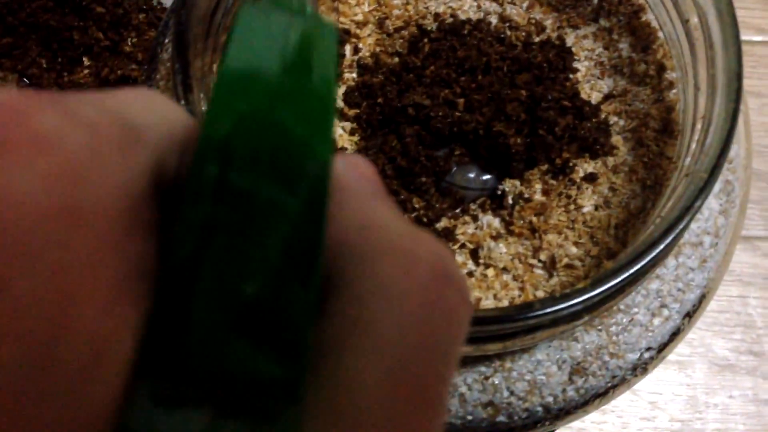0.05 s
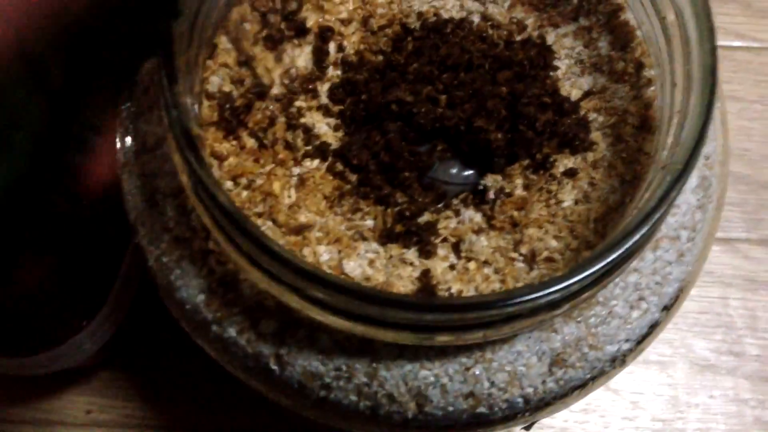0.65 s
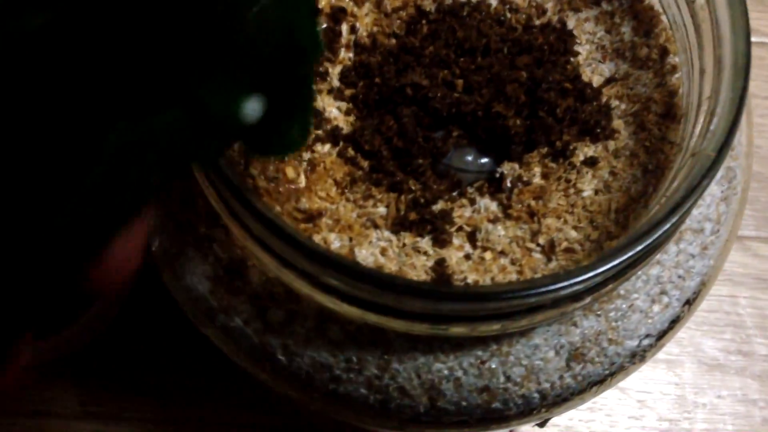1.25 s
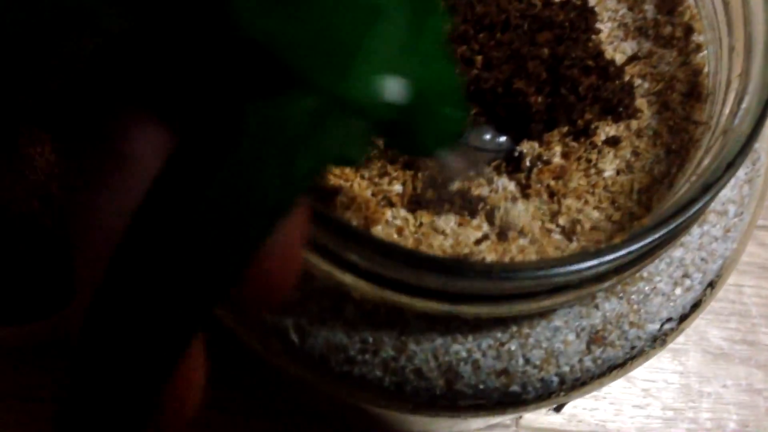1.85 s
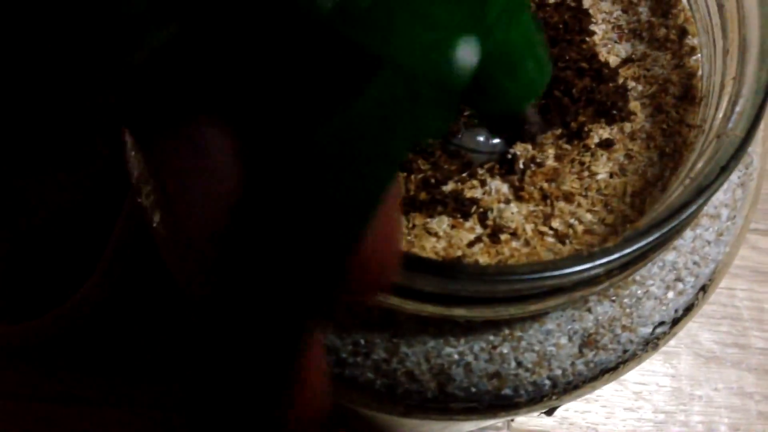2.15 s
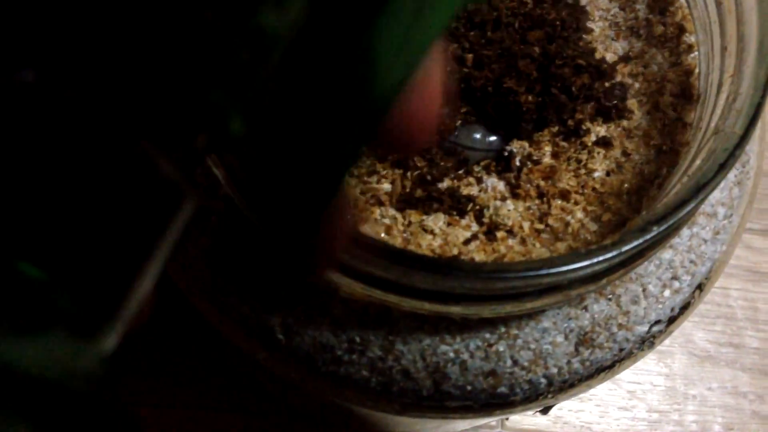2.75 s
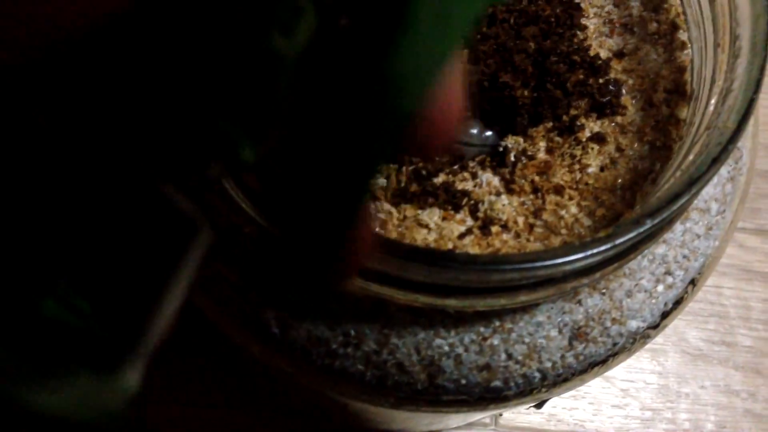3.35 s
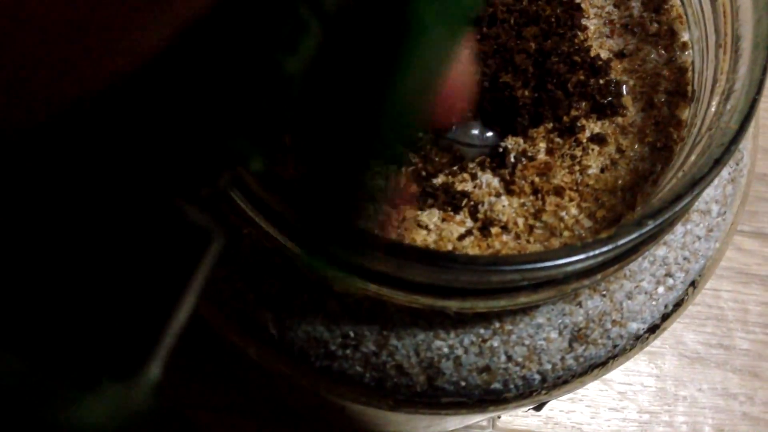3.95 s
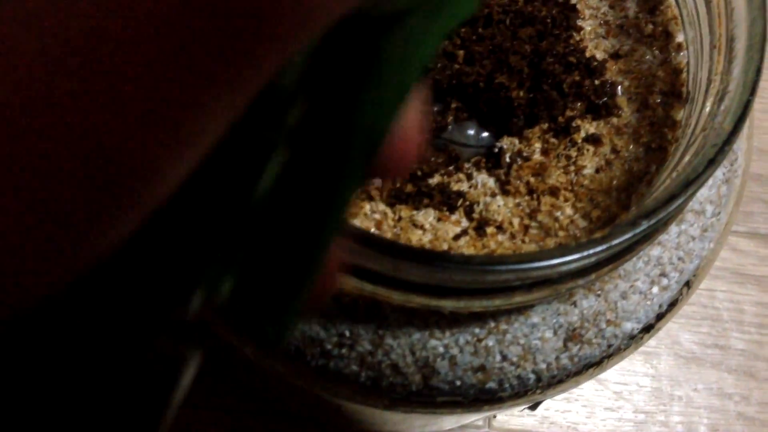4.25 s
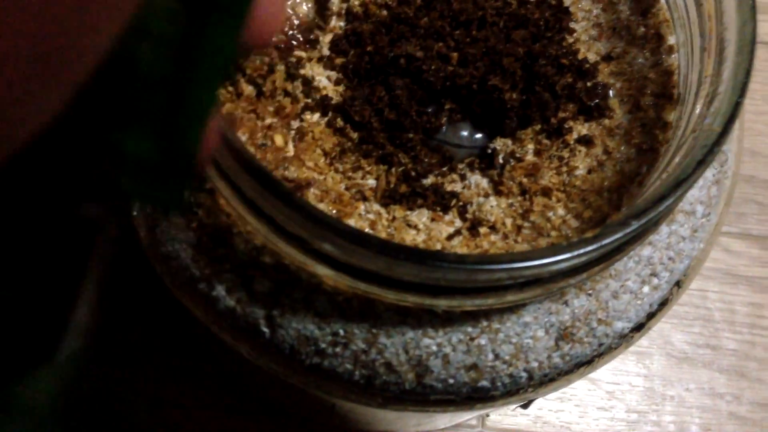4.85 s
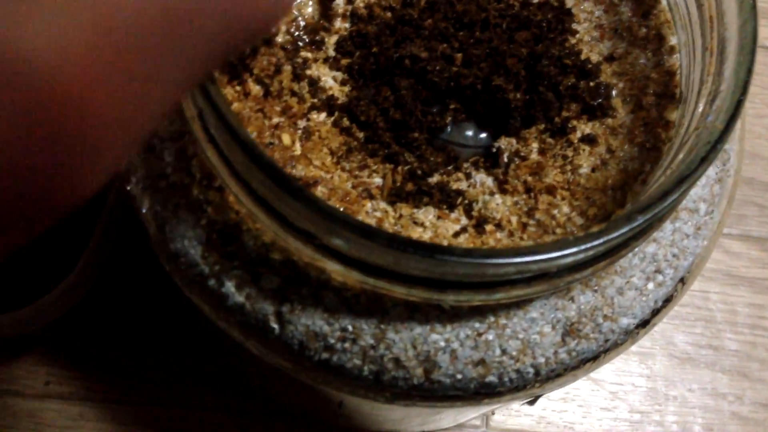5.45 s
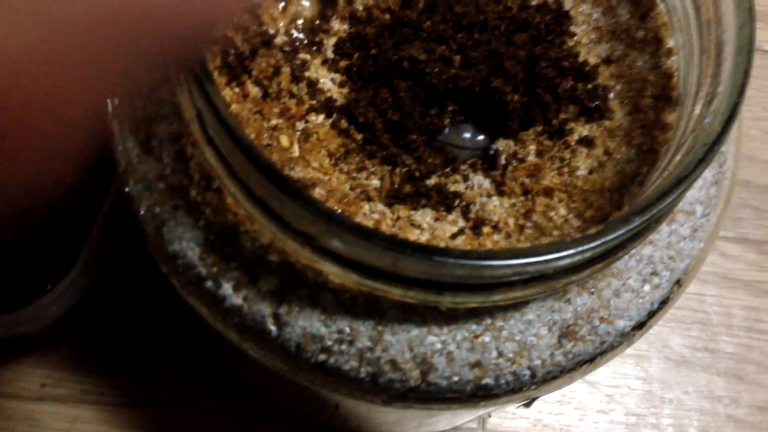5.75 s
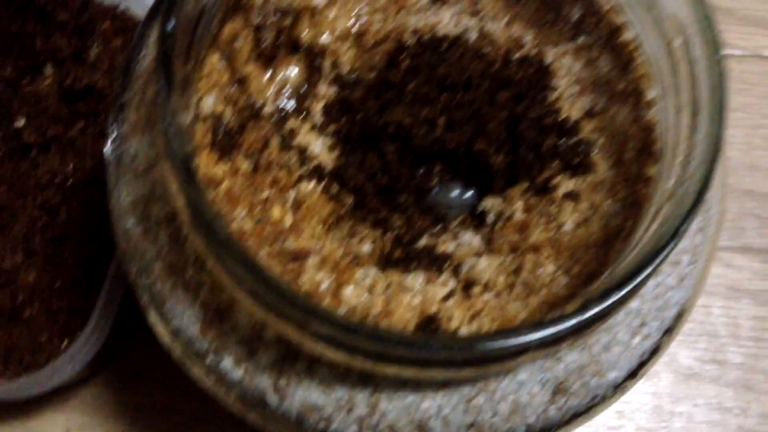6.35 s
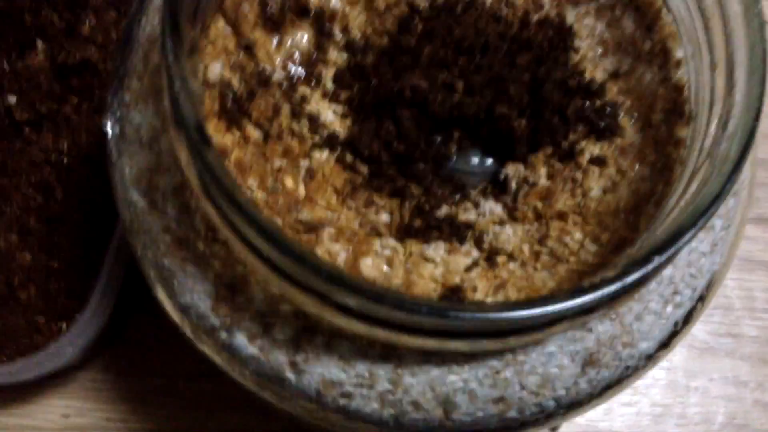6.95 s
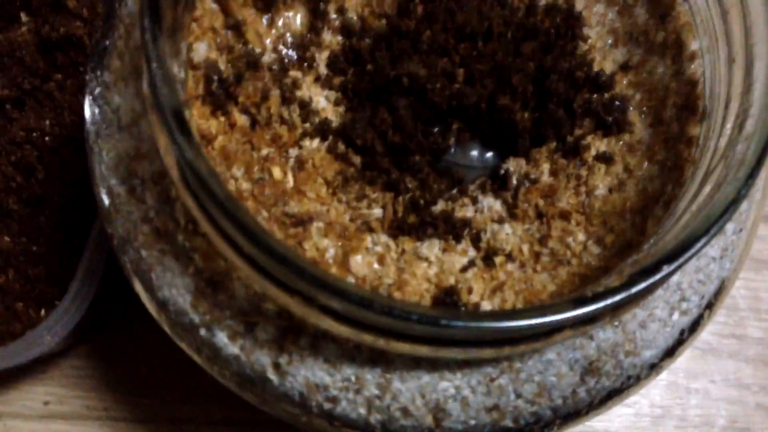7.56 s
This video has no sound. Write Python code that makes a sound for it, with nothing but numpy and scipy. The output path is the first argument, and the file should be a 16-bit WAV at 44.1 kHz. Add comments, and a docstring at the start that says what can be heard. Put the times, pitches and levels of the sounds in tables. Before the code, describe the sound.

A trigger spray bottle mists soil in a glass jar, heard close up over the faint hush of a small room. It opens with a click and a sharp squirt, then wet sputters and small glugs from about 0.5 to 0.8 seconds. Between 1.1 and 2.7 seconds come five smooth swells of hiss, evenly spaced, the last one softer. From 3 to 5 seconds the nozzle draws air and spits in irregular, crackling bursts with fine droplets and an occasional glug. Two gentler sprays follow at about 5.2 and 5.6 seconds. The plastic trigger clicks throughout the spraying, and a faint low hum from the jar sits under the jet. Around 6.3 seconds there is a quick cluster of hollow handling knocks, then another thud at 6.8 and lighter knocks near 7.4, with soft rubbing and a barely audible ring of glass.

```python
"""Spray bottle misting soil in a glass jar.

Close by in a quiet room, clean trigger strokes give smooth arches of hiss. When the tilted bottle draws
air, the nozzle spits and crackles. The plastic trigger clicks, water glugs and the jet stirs the jar's
air into a low hum. A few handling knocks follow."""
import sys
import numpy as np
from scipy import signal
from scipy.fft import rfft, irfft
from scipy.io import wavfile
from scipy.ndimage import uniform_filter1d

SR = 44100
rng = np.random.default_rng(int(sys.argv[2]) if len(sys.argv) > 2 else 0)


def write(x):
    x = np.atleast_2d(x).T
    wavfile.write(sys.argv[1], SR, np.round(np.clip(x, -1, 1) * 32767).astype(np.int16))


N = 340011
TIME = np.arange(N) / SR
BINS_HZ = np.fft.rfftfreq(4096, 1 / SR)


def amp(db):
    """Decibels to gain."""
    return 10 ** (np.asarray(db) / 20)


def unit(x):
    """Scales to rms 1."""
    return x / np.sqrt(np.mean(x ** 2) + 1e-20)


def crest(x):
    """Scales a hit so that its loudest 3 ms have rms 1."""
    return x / np.sqrt(uniform_filter1d(x ** 2, size=132, mode="constant").max() + 1e-20)


def power(x, samples):
    """Running mean square."""
    return abs(uniform_filter1d(x ** 2, size=samples))


def curve(points, hz=BINS_HZ):
    """Interpolates (Hz, value) points on a log-frequency axis."""
    point_hz, value = np.transpose(points)
    return np.interp(np.log(hz + 1), np.log(point_hz + 1), value)


def bump(hz, width_hz):
    """A resonance's outline over frequency, of height 1."""
    return 1 / (1 + (2 * (BINS_HZ - hz) / width_hz) ** 2)


def colour(x, db):
    """Minimum-phase filter with the given gain at each bin."""
    log_gain = np.log(amp(np.maximum(db, -100)))
    mirrored = np.concatenate([log_gain, log_gain[-2:0:-1]])
    taps = np.fft.ifft(np.exp(np.conj(signal.hilbert(mirrored)))).real
    return signal.oaconvolve(x, taps[:len(BINS_HZ)])[:len(x)]


def noise(db, samples=N):
    """Steady noise of rms 1 with the given spectrum."""
    return unit(colour(rng.standard_normal(samples), db))


def band(hz, width_hz, samples=N, skirt_db=30):
    """Noise of rms 1 around hz; more skirt_db gives steeper sides."""
    return noise(skirt_db * np.log10(bump(hz, width_hz)), samples)


def burst(envelope, db):
    """A noise hit with the given envelope and spectrum, at crest level 1."""
    return crest(colour(rng.standard_normal(len(envelope)) * envelope, db))


def wander(rate_hz):
    """Smooth random motion of rms 1, mostly below rate_hz."""
    lowpass = 1 / (1 + (np.fft.rfftfreq(N, 1 / SR) / rate_hz) ** 4)
    return unit(irfft(rfft(rng.standard_normal(N)) * lowpass, N))


def swell(peak_s, half_s):
    """A bell-shaped envelope of height 1."""
    return np.exp(-((TIME - peak_s) / half_s) ** 2)


def ring(hz, rise_s, t60_s):
    """A tone that swells, then decays."""
    t = TIME[:SR // 3]
    decay = amp(-60 * np.maximum(t - rise_s, 0) / t60_s)
    return np.sin(2 * np.pi * hz * t) * np.minimum(t / rise_s, 1) * decay


def resonate(x, hz, width_hz):
    """A resonance that follows the curve hz, applied twice for steep sides."""
    carrier = np.exp(2j * np.pi * np.cumsum(hz) / SR)
    pole = np.exp(-np.pi * width_hz / SR)
    return (carrier * signal.lfilter([(1 - pole) ** 2], [1, -2 * pole, pole ** 2], x / carrier)).real


def impulses(per_s, least_db, spread_db):
    """Impulses at random times, most of them small."""
    sizes = amp(least_db + spread_db * np.minimum(rng.exponential(1, N), 2))
    return (rng.random(N) < per_s / SR) * sizes


def add(mix, start_s, sound):
    """Mixes a sound in at start_s."""
    part = mix[max(round(start_s * SR), 0):][:len(sound)]
    part += sound[:len(part)]


# Background spectrum. Each row: frequency in Hz, relative density in dB.
HUSH_SPECTRUM = [(30, -6), (80, -6.5), (130, -10), (250, -0.5), (450, -10.5), (850, -6), (1100, -14.5),
                 (2000, -19), (3200, -24.5), (5500, -28.5), (7700, -28.5), (10000, -33), (13500, -31),
                 (15500, -30.5)]

def hush(db=-59.5):
    """The room's steady low noise."""
    return amp(db) * noise(curve(HUSH_SPECTRUM))


# Room decay. Each row: frequency in Hz, T60 in seconds.
ROOM_DECAY = [(200, 0.95), (1000, 0.45), (4000, 0.24), (14000, 0.28)]

def room(x, wet_db=-20):
    """A small furnished room adds a weak tail whose treble dies first."""
    hz, t, spectra = signal.stft(rng.standard_normal(SR // 2), SR, nperseg=256)
    decay = amp(-60 * t / curve(ROOM_DECAY, hz)[:, None])
    tail = signal.istft(spectra * decay, SR, nperseg=256)[1]
    tail[:SR // 250] = 0
    return x + amp(wet_db) * signal.fftconvolve(x, tail / np.linalg.norm(tail))[:N]


# Grip rumble. Each row: time in seconds, level in dB.
GRIP_LEVELS = [(7.38, -70), (7.42, -55.5), (7.52, -56.5), (7.6, -63.5), (7.7, -67)]
# A sleeve or hand passing. Each row: peak time in seconds, half length in seconds, level in dB.
BRUSH_PASSES = [(6.746, 0.18, -61.5), (7.639, 0.017, -55)]
# Brushing spectrum. Each row: frequency in Hz, relative density in dB.
BRUSH_SPECTRUM = [(300, -9), (1200, 7.5), (2200, 1.5), (4000, -2), (8000, -3.5), (10000, -12), (15000, -11)]

def rubbing():
    """The hand shifts its grip with a low rumble and soft brushes."""
    grip_db = np.interp(TIME, *np.transpose(GRIP_LEVELS), left=-120, right=-120)
    grip = uniform_filter1d(amp(grip_db), size=60)
    rumble = noise(curve([(60, -57), (130, 0.5), (200, 4), (400, -10.5), (1500, -22), (8000, -40)]))
    passes = sum(amp(db) * swell(peak_s, half_s) for peak_s, half_s, db in BRUSH_PASSES)
    return rumble * grip + noise(curve(BRUSH_SPECTRUM)) * passes


# Modes of the jar's glass. Each row: frequency in Hz, relative level in dB, T60 in seconds.
GLASS_MODES = [(3050, -4, 0.27), (5730, -5, 0.32), (7140, -3, .4), (9300, 0, 0.28), (12650, -8, .3)]
# Touches on the jar. Each row: start in seconds, gain in dB.
GLASS_TOUCHES = [(6.367, -68), (7.353, -63.5)]

def glass():
    """A light touch on the jar sets its high modes ringing."""
    out = np.zeros(N)
    chime = sum(amp(db) * ring(hz, 0.00085, t60_s) for hz, db, t60_s in GLASS_MODES)
    for start_s, db in GLASS_TOUCHES:
        add(out, start_s, amp(db) * chime)
    return out


# Handling knocks. Each row: start in seconds, thud level in dB, thud pitch in Hz, rattle level in dB.
HANDLING_KNOCKS = [(6.257, -23.5, 168.5, -31.5), (6.277, -28.5, 166.3, -33.5), (6.365, -31, 306, -32.5),
                   (6.411, -44.5, 300, -39), (6.771, -27, 146, -48), (6.845, -45.5, 219, -56),
                   (7.354, -39.5, 169, -42), (7.405, -41.5, 162, -50.5)]
# Modes of the rattle. Each row: nominal frequency in Hz, relative level in dB, T60 in seconds.
RATTLE_MODES = [(364, 6, 0.051), (497, -7, .07), (800, -3, 0.076), (1074, -1.5, 0.03), (1314, 3, 0.03),
                (1420, -1, 0.071), (1800, -4, 0.031), (2200, -18, 0.027), (2730, -26, 0.028),
                (4570, -8, 0.026)]

def knocks(scuff_s=0.015, scuff_db=-8, tick_s=0.0043, tick_db=-13):
    """A blow gives a low thud, a hollow rattle with a short scuff, and a tick."""
    out, t = np.zeros(N), TIME[:SR // 3]
    scuff_spectrum = curve([(60, -26), (200, 2.5), (1500, 6.5), (5000, -8.5), (15000, -30)])
    tick_spectrum = curve([(1500, -4.5), (4500, 6), (9000, -3), (15000, -12)])
    for start_s, thud_db, thud_hz, rattle_db in HANDLING_KNOCKS:
        modes = sum(amp(db) * ring(hz * rng.uniform(0.91, 1.02), 0.0012, t60_s) * rng.choice([-1, 1])
                    for hz, db, t60_s in RATTLE_MODES)
        scuff = amp(scuff_db) * burst(np.exp(-t / scuff_s), scuff_spectrum)
        tick = amp(tick_db) * burst(np.exp(-t / tick_s), tick_spectrum)
        add(out, start_s, amp(thud_db) * ring(thud_hz, rise_s=0.0024, t60_s=0.086))
        add(out, start_s, amp(rattle_db) * (crest(modes) + scuff + tick))
    return out


def ticking(start_s=5.805, every_s=0.0475, db=-60, decay_s=0.0014, count=7):
    """A short, even run of very fine ticks after the last stroke."""
    out, t = np.zeros(N), TIME[:SR // 50]
    spectrum = curve([(3000, -20), (9000, -18), (13000, 5)])
    for k in range(count):
        add(out, start_s + k * every_s, amp(db) * burst(np.exp(-t / decay_s), spectrum))
    return out


# Vent whistles. Each row: peak time and half length in seconds, level in dB, pitch and width in Hz.
VENT_WHISTLES = [(2.516, 0.019, -62.5, 8200, 2500), (4.735, 0.034, -69, 8100, 250),
                 (6.007, 0.049, -70, 7600, 600)]

def vents():
    """Air seeps back into the bottle with a thin whistle."""
    return sum(amp(db) * band(hz, width_hz) * swell(peak_s, half_s)
               for peak_s, half_s, db, hz, width_hz in VENT_WHISTLES)


# Glugs, pops and chirps in the bottle. Each row: start in seconds, peak level in dB, pitch in Hz.
BOTTLE_GLUGS = [(.474, -27, 256), (.478, -38, 573), (.502, -33.5, 1110), (.608, -29.5, 807),
                (0.978, -34.5, 1336), (3.655, -41.5, 263), (3.656, -42.5, 640), (4.717, -41, 269),
                (4.747, -35, 253), (5.130, -43, 687), (5.524, -36.5, 696), (5.527, -42, 260)]

def glugs(rise_cycles=2.35, big_hz=260, big_t60_s=0.067):
    """Bubbles and the bottle's hollow ring briefly: the higher, the shorter."""
    out = np.zeros(N)
    for start_s, db, hz in BOTTLE_GLUGS:
        t60_s = big_t60_s * (big_hz / hz) ** 0.41
        add(out, start_s, amp(db) * ring(hz, rise_cycles / hz, t60_s))
    return out


# Trigger and valve clicks. Each row: start in seconds, level in dB before gain_db,
# low body and high edge as tone settings in dB, ring pitch in Hz.
TRIGGER_CLICKS = [(0.0941, -29.5, -26, -10, 8100), (.4848, -40, -4, -38, 2710),
                  (.5627, -37.5, -31, -20, 5060), (.6614, -29.5, -45, -22, 5300),
                  (.7839, -31.5, -24, -39, 4830), (.976, -31, -6, -17, 8400), (1.0781, -34, -21, -24, 5840),
                  (1.2206, -43.5, -6, -5, 5030), (1.3731, -33.5, -13.5, -15.5, 6200),
                  (1.413, -39, -21, -16, 6160), (1.62, -46, -6, -9, 4570), (1.7689, -30, -28, -12.5, 8950),
                  (1.9977, -38.5, -27, -2, 6660), (2.158, -43, -36, -5, 6630), (2.1782, -46, -22, -7, 8060),
                  (2.4184, -40, -12.5, -8, 8200), (2.582, -48.5, -27, -9, 7700),
                  (2.8407, -40, -28, -12.5, 4770), (2.9731, -48, -33, -12, 4630),
                  (3.1752, -38.5, -23, -13, 4600), (3.234, -47, -12, -18, 7400),
                  (3.5324, -37.5, -28, -43, 3180), (4.2411, -43, -3, -36, 7220),
                  (4.6904, -44, -10, -18, 7560), (4.811, -37, -8, -31, 3300),
                  (4.9894, -41.5, -20, -16, 7460), (5.1282, -28.5, -9.5, -28, 4600),
                  (5.1405, -36, -11, -8, 8520), (5.16, -38, -29, -6, 4400), (5.2072, -31, -22, -17, 5060),
                  (5.316, -37.5, -28, -11, 2260), (5.5221, -29.5, -14.5, -22, 3440),
                  (5.697, -37.5, -39, -12, 8600), (5.7227, -47, -10, -24, 2480),
                  (5.8491, -43.5, -5.5, -58, 2480)]
# Spectrum of a small sharp impact. Each row: frequency in Hz, gain in dB.
IMPACT_SPECTRUM = [(200, -27), (700, 4.5), (1400, -0.5), (2400, 2), (5000, -1), (8500, 0.5), (10300, -0.5),
                   (13000, -4), (15500, -4.5)]

def clicks(gain_db=-2, rise_s=0.00028, snap_s=0.0027, rattle_db=-13, rattle_s=0.0097,
           usual_body_db=-13, usual_edge_db=-14, ring_db=8):
    """Each snap of plastic is a sharp crack and a few milliseconds of rattle in the spray head."""
    out, t = np.zeros(N), TIME[:SR // 12]
    lows, highs = curve([(1700, 0.93), (2600, 0.12)]), curve([(8500, 0.17), (10500, 1)])
    attack = 1 - np.exp(-(t / rise_s) ** 2)
    for start_s, db, body_db, edge_db, hz in TRIGGER_CLICKS:
        heavier_db = body_db - usual_body_db
        stretch = 2 ** (heavier_db / 20)  # a snap that shakes the whole head outlasts a thin valve tick
        decay = np.exp(-t / (snap_s * stretch)) + amp(rattle_db) * np.exp(-t / (rattle_s * stretch))
        spectrum = curve(IMPACT_SPECTRUM) + lows * heavier_db + highs * (edge_db - usual_edge_db)
        spectrum += ring_db * bump(hz, width_hz=900)
        add(out, start_s, amp(db + gain_db) * burst(attack * decay, spectrum))
    return out


def creaks(decay_s=0.002):
    """Tiny stray ticks of the plastic while the trigger is being worked."""
    t = TIME[:SR // 100]
    working = TIME < TRIGGER_CLICKS[-1][0]
    strikes = impulses(per_s=8, least_db=-55, spread_db=3) * working
    tick = rng.standard_normal(len(t)) * np.exp(-t / decay_s)
    spectrum = curve([(500, -27), (3000, 3), (8000, 2), (10000, -11), (15000, -36)])
    return colour(signal.oaconvolve(strikes, tick)[:N], spectrum)


def jar_echoes(x, echo_db=-9, nearest_s=0.0004, farthest_s=0.005, count=6):
    """The glass walls throw back very short echoes, which comb the sound differently at each aim."""
    taps = np.zeros(SR // 100)
    delays = (rng.uniform(nearest_s, farthest_s, count) * SR).astype(int)
    taps[delays] = amp(echo_db) * rng.choice([-1, 1], count) / np.sqrt(np.arange(count) + 1)
    taps[0] = 1
    return signal.oaconvolve(x, taps / np.linalg.norm(taps))[:len(x)]


# The jar's hum. Each row: time in seconds, level in dB relative to the jet that drives it.
HUM_LEVELS = [(.1, -17), (1.9, -20), (2.35, -11.5), (3.1, -8.5), (3.4, -9.5), (4.55, -7.5), (5.2, -5.5),
              (5.6, -19)]

def jar_hum(jet, lag_s=0.012, cap_db=-41, murmur_db=-64, until_s=6.22, fade_s=0.43):
    """The jet stirs the jar's air into a lagging hum; the jar also murmurs while the hand moves above."""
    murmur = amp(murmur_db) * band(247.7, width_hz=127) * np.clip((until_s - TIME) / fade_s, 0, 1)
    pole = np.exp(-1 / (lag_s * SR))
    drive = np.minimum(power(jet, 400), amp(cap_db) ** 2)
    strength = np.sqrt(signal.lfilter([1 - pole], [1, -pole], drive))
    hum = band(246, width_hz=90)
    hum /= np.sqrt(power(hum, 1200) + 0.057)  # steadies the level
    return murmur + amp(np.interp(TIME, *np.transpose(HUM_LEVELS))) * strength * hum


def droplets(spits, cap_db=-45.5):
    """Coarse drops thrown out with each spit crackle on the glass and the soil."""
    strength = np.minimum(np.sqrt(power(spits, 1300)), amp(cap_db))
    strikes = impulses(per_s=110, least_db=11, spread_db=3) * strength
    return jar_echoes(colour(strikes, curve(IMPACT_SPECTRUM)))


def bubbles(spits, low_hz=2600, high_hz=9000, t60_s=0.0055, cap_db=-36, pitches=24):
    """Tiny bubbles burst in each spit at random pitches: a wet crackle."""
    strength = np.minimum(np.sqrt(power(spits, 700)), amp(cap_db))
    pops = impulses(per_s=260, least_db=1, spread_db=2.5) * strength
    pitch_index = rng.integers(0, pitches, N)
    return sum(signal.oaconvolve(pops * (pitch_index == k), ring(hz, 1 / hz, t60_s)[:SR // 50])[:N]
               for k, hz in enumerate(np.geomspace(low_hz, high_hz, pitches)))


def splash(samples, hz, width_hz):
    """Drops or air striking inside the jar: a steep-sided band of noise."""
    return band(hz, width_hz, samples, skirt_db=40)


# Spectrum of the finest drops. Each row: frequency in Hz, relative density in dB.
FIZZ_SPECTRUM = [(2000, -32), (8000, 0.5), (10200, -5), (12800, -1.5), (14400, -6), (15500, -8)]

def fizz(samples):
    """Thin hiss of the finest drops."""
    return noise(curve(FIZZ_SPECTRUM), samples)


# Bursts of water and air. Each row: start and length in seconds, level in dB before gain_db,
# fizz and slurp in dB relative to that level.
SPURT_BURSTS = [(0.095, 0.0082, -43.5, 9, -16), (.108, 0.02, -34.5, 2.5, -2.5),
                (0.503, 0.036, -47, -16, -7), (0.551, 0.043, -53, -1, -9), (0.615, .045, -47, -2, -12),
                (0.674, 0.021, -34.5, 0.5, -18), (0.698, 0.052, -38.5, -0.5, -3),
                (2.012, 0.017, -52, -11, -2), (3.037, 0.1, -51, -1.5, -9), (3.087, .027, -30, 4.5, -12),
                (3.335, 0.019, -40, -6, -14), (3.364, 0.11, -35, 1.5, -9.5), (3.521, 0.034, -47, -27, -5),
                (3.651, 0.041, -54.5, -26, -13), (3.7, 0.029, -38, -10, -11),
                (3.856, 0.05, -53.5, -21, -3.5), (3.972, 0.028, -50.5, -19, -11),
                (4.011, 0.0094, -36.5, -1, -19), (4.029, 0.031, -32, 1, -6.5),
                (4.137, 0.017, -43.5, -25, -6.5), (4.253, 0.057, -39, -3, -12),
                (4.343, 0.0065, -38.5, -0.5, -11), (4.379, 0.03, -49, -17, -4),
                (4.507, 0.0098, -46, -16, -7), (4.526, 0.036, -41, 0, -16), (4.557, 0.031, -37, 0, -3),
                (4.826, 0.068, -39, 0.5, -7.5), (4.936, 0.007, -55.5, 11, -9)]
# Spectrum of the spitting jet. Each row: frequency in Hz, relative density in dB.
SPURT_SPECTRUM = [(300, -34), (700, -25), (1500, -15), (2100, 1), (2600, -11.5), (4200, -6), (6000, -5),
                  (8300, -0.5), (10200, -9.5), (15000, -9)]
# Nozzle resonances. Each row: frequency in Hz, width in Hz, boost in dB.
NOZZLE_MODES = [(2090, 100, 4.5), (3200, 570, 14.5), (4870, 580, 10.5), (7220, 770, 9)]

def spurts(gain_db=-2, rise_s=0.0005, fall_s=0.01, arch_db=3, drizzle_db=-19, drizzle_s=0.016,
           slurp_from_hz=6200, slurp_to_hz=2640, usual_jet_db=-40, usual_splash_db=-50.5):
    """Air pockets chop the jet into bursts; each starts at once, swells and trails off in drizzle."""
    out, t = np.zeros(N), TIME[:SR // 5]
    nozzle = curve(SPURT_SPECTRUM) + sum(db * bump(hz, width_hz) for hz, width_hz, db in NOZZLE_MODES)
    for start_s, length_s, db, fizz_db, slurp_db in SPURT_BURSTS:
        progress, after_s = np.minimum(t / length_s, 1), np.maximum(t - length_s, 0)
        # a resonance falls as water fills the nozzle
        slurp_hz = slurp_from_hz * (slurp_to_hz / slurp_from_hz) ** progress
        slurp = unit(resonate(rng.standard_normal(len(t)), slurp_hz, width_hz=1400))
        jet = amp(db) * (noise(nozzle, len(t)) + amp(slurp_db) * slurp + amp(fizz_db) * fizz(len(t)))
        # a harder burst atomises finer, so its splash grows little
        splash_db = usual_splash_db + 0.22 * (db - usual_jet_db)
        jet += amp(splash_db) * splash(len(t), hz=925, width_hz=1000)
        arch = amp(gain_db + arch_db * (np.sin(np.pi * progress) - 1))
        attack = np.minimum(t / rise_s, 1)
        release = np.exp(-after_s / fall_s) + amp(drizzle_db) * np.exp(-after_s / drizzle_s)
        add(out, start_s, jar_echoes(jet, echo_db=-3.5) * arch * attack * release)
    chop_db = 2.5 * np.clip(wander(rate_hz=150), -2, 1.3)  # bubbles break the flow
    grain_db = 3 * wander(rate_hz=750)  # single drops crackle
    sputter = amp(chop_db + grain_db)
    return out * sputter / np.sqrt(power(sputter, 900))


# Clean strokes. Each row: pressure peak in seconds, jet level in dB,
# then splash, fizz and low puff in dB relative to the jet.
MIST_STROKES = [(0.083, -47.5, -18, -1, -18), (1.11, -37.5, -13.5, -6, -20.5),
                (1.519, -37.5, -10, -10, -25), (1.897, -40, -10.5, -7, -40),
                (2.316, -39.5, -10, -6.5, -12.5), (2.728, -46.5, -9, -2.5, -7.5),
                (5.232, -45.5, -15, -1, -20), (5.613, -49.5, -15, 0, -29)]
# Spectrum of the atomised jet. Each row: frequency in Hz, relative density in dB.
MIST_SPECTRUM = [(300, -16), (520, -16.5), (1000, 0.5), (1450, -7.5), (1900, -1), (2550, -6.5), (3100, -5),
                 (4900, -1), (5600, -5.5), (7500, -2), (8500, -7), (9400, -10), (10200, -27),
                 (15500, -24.5)]

def mist(rise_s=0.072, fall_s=0.062, steepness=2.38, flutter_db=1.37):
    """Pressure rises and falls with each squeeze; the jet, its fizz, its splash and a low puff follow."""
    out, t = np.zeros(N), TIME[:SR // 2]
    for peak_s, db, splash_db, fizz_db, puff_db in MIST_STROKES:
        start_s = max(peak_s - 0.25, 0)
        from_peak_s = t + start_s - peak_s
        flank_s = np.where(from_peak_s < 0, rise_s, fall_s)
        arch = amp(db - 10 * abs(from_peak_s / flank_s) ** steepness)
        jet = noise(curve(MIST_SPECTRUM), len(t)) + amp(fizz_db) * fizz(len(t))
        drumming = amp(splash_db) * splash(len(t), hz=1010, width_hz=780)
        puff = amp(puff_db) * splash(len(t), hz=573, width_hz=720)  # the jet's air strikes the soil
        add(out, start_s, arch * jar_echoes(jet + drumming + puff, echo_db=-10.5))
    return out * amp(flutter_db * wander(rate_hz=140))  # the cone of mist trembles


def scene():
    """Bottle, jar and handling over the room's steady hush."""
    spits = spurts()
    jet = mist() + spits
    bottle = clicks() + creaks() + vents() + glugs() + ticking()
    handling = knocks() + glass() + rubbing()
    near = jet + jar_hum(jet) + droplets(spits) + bubbles(spits) + bottle + handling
    return (room(near) + hush())[None]


def record(dry):
    """The microphone's bass roll-off at 115 Hz, then a band limit at 15550 Hz."""
    highpass = signal.butter(4, 115, "high", fs=SR, output="sos")
    lowpass = signal.firwin(301, 15550, window=("kaiser", 9), fs=SR)
    return signal.oaconvolve(signal.sosfilt(highpass, dry), lowpass[None], "same")


dry = scene()
out = record(dry)
write(out)
```